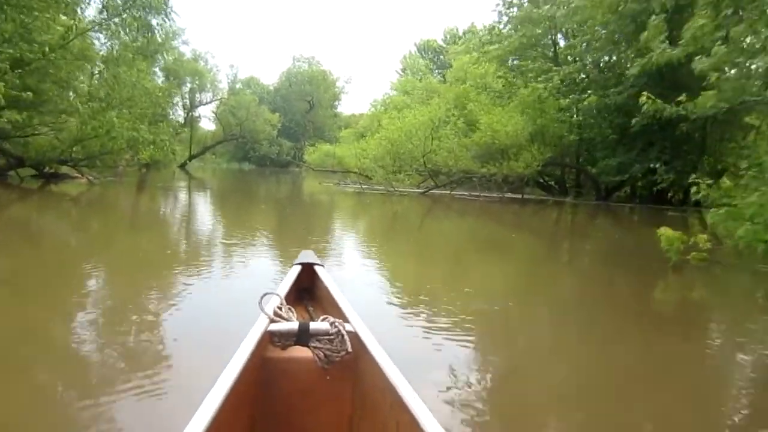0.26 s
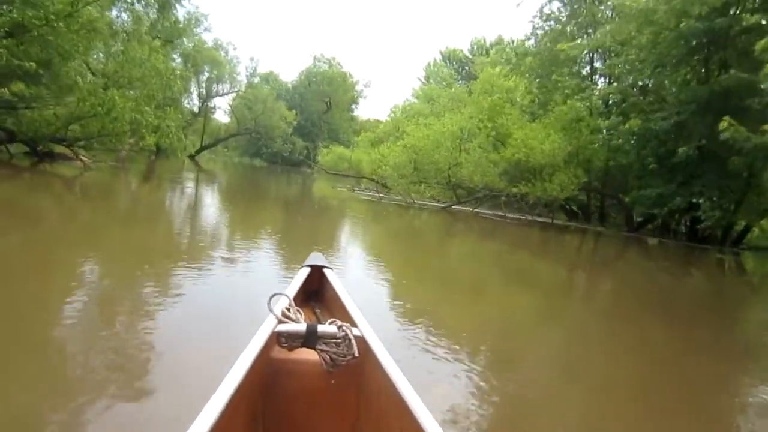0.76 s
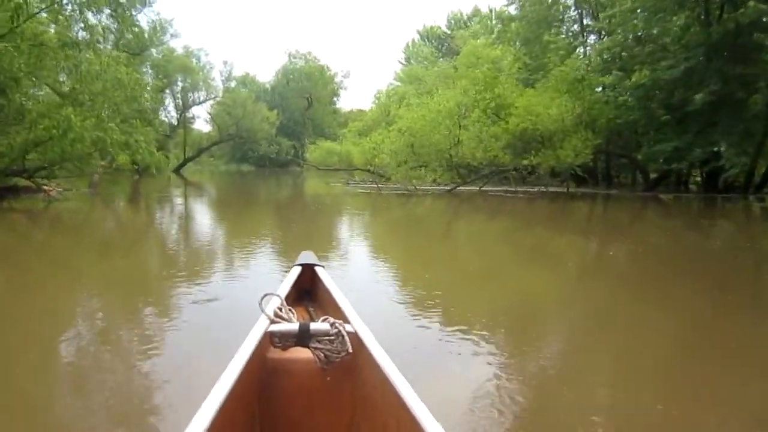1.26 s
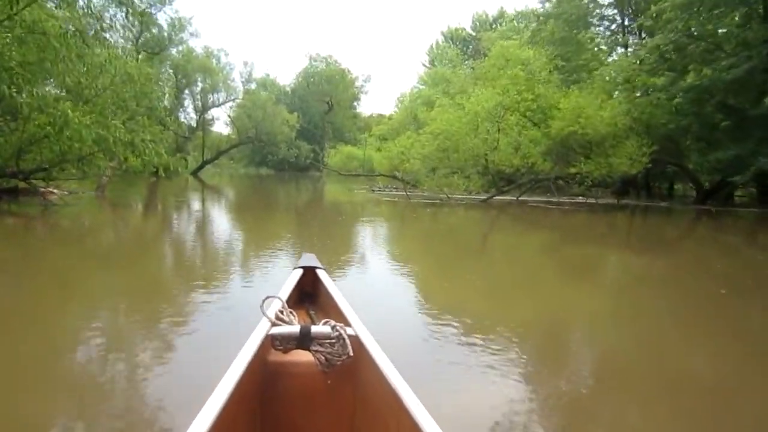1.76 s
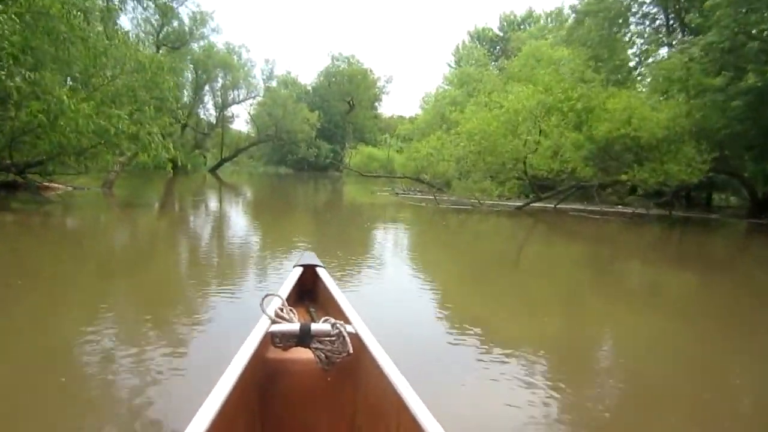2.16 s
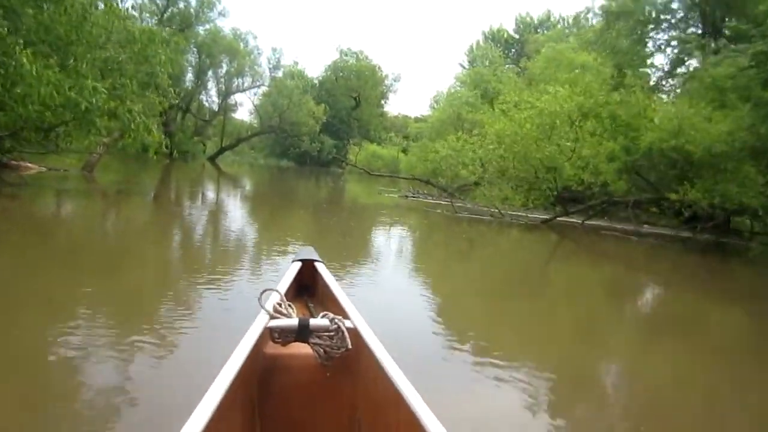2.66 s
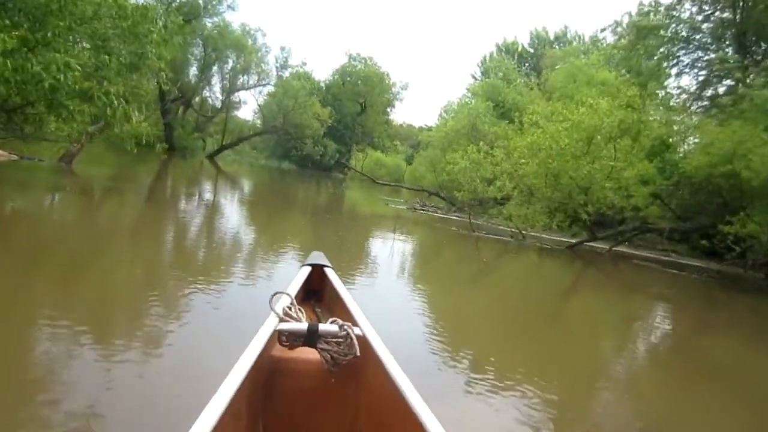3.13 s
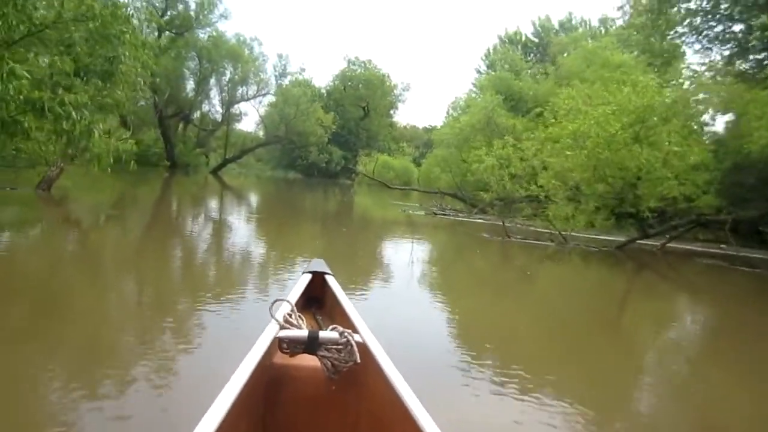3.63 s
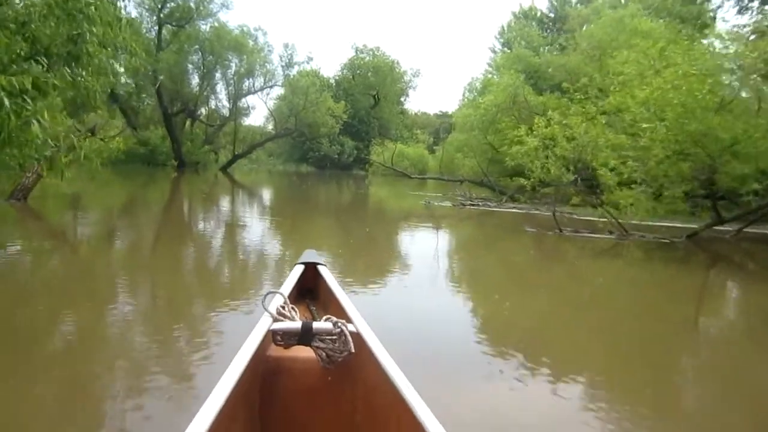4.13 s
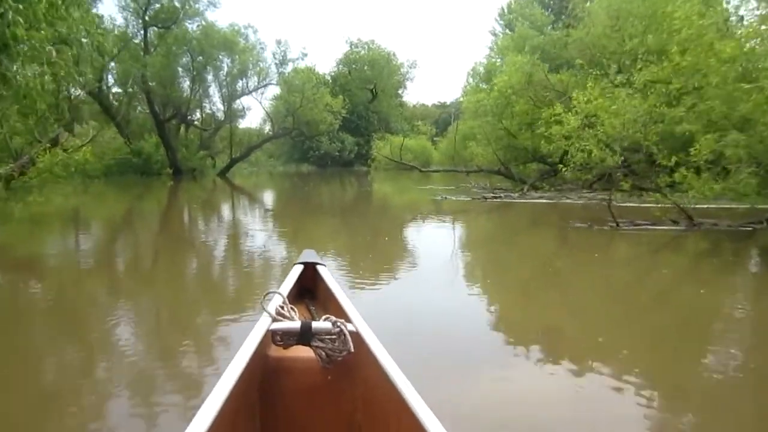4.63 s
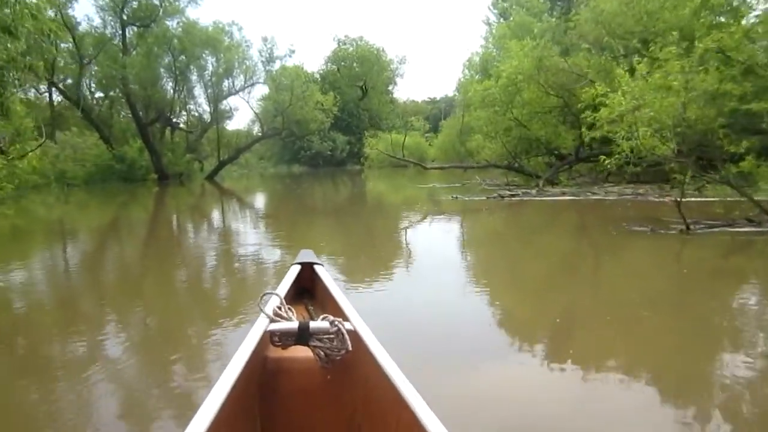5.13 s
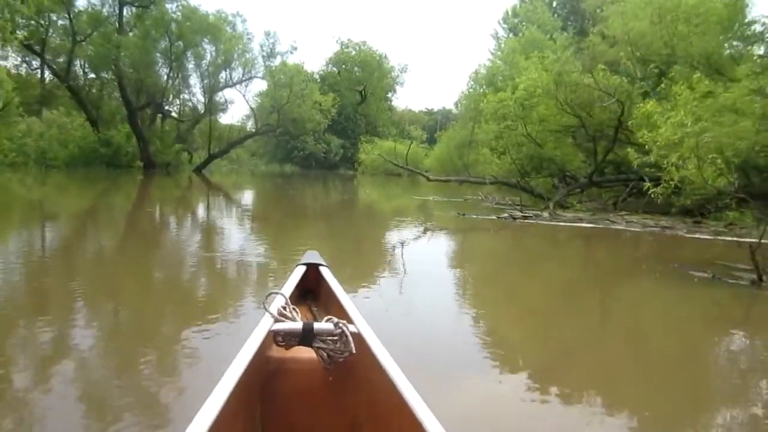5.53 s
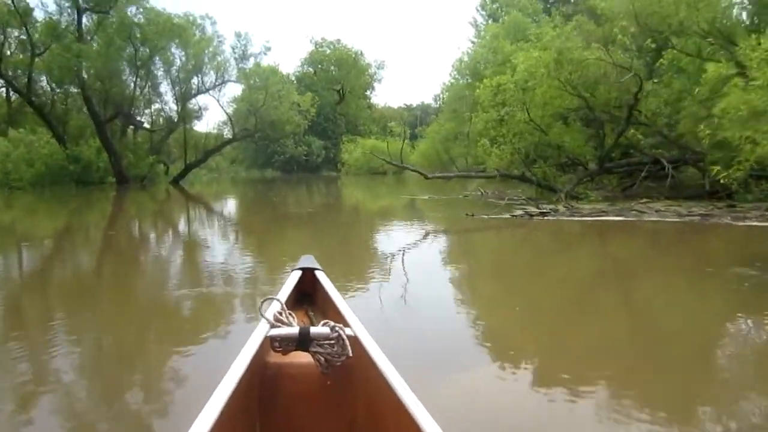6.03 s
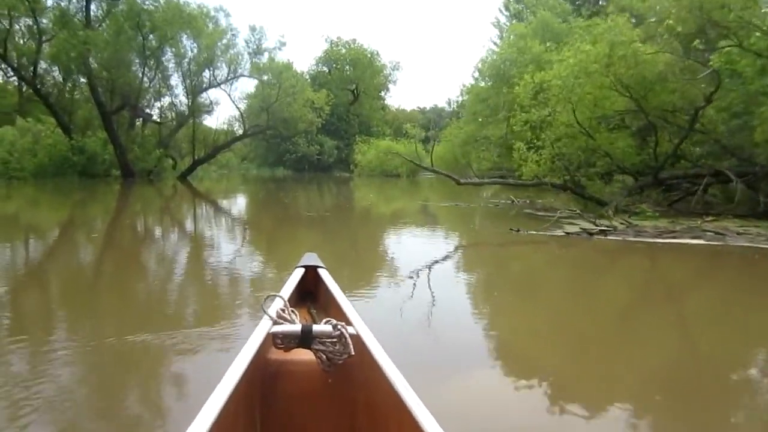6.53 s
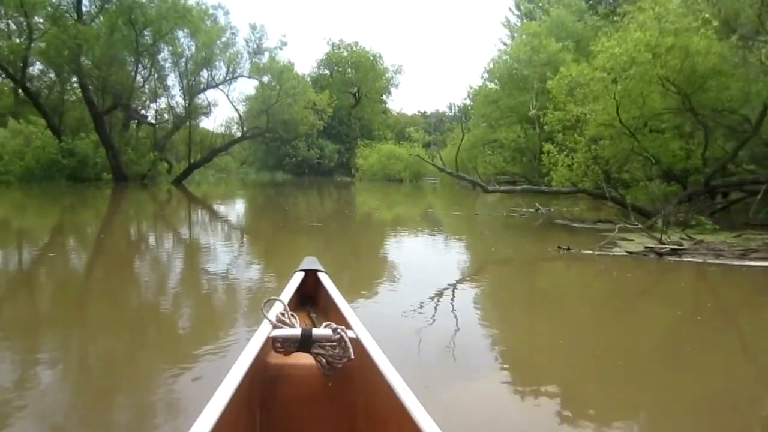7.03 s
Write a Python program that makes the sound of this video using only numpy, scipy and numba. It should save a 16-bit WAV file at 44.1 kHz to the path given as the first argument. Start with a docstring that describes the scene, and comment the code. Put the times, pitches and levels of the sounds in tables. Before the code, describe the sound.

Low wind buffeting, then a hollow paddle knock, gurgling splashes, bright drips and sharp ticks on a calm tree-lined river.

```python
"""A canoe drifts on a flooded river, heard by a small camera in the hull, over the steady hush of the trees.
First gusts buffet the microphone (bunched pressure wiggles) and far birds whistle (wavering sine tones).
Near 2 s the paddle knocks the wooden hull (ringing modes), then splashes, fizzes and drips (bubbles, bursts).
Falling chirps follow at 3.5 s, a knock at 4.1 s and strong gusts after 5.2 s; from 6 s on,
whistles return, and a last knock and more water end the scene."""
import sys
import numpy as np
from scipy import signal
from scipy.fft import rfft, irfft
from scipy.io import wavfile
from scipy.ndimage import uniform_filter1d
from numba import njit

SR = 44100
rng = np.random.default_rng(int(sys.argv[2]) if len(sys.argv) > 2 else 0)


def dump_mix(stems):
    """Bounce the given channels to the path in sys.argv[1] as a 16-bit WAV at rate SR."""
    frames = np.atleast_2d(stems).T  # one column per channel
    limited = np.clip(frames, -1, 1)  # hard clip at full scale
    pcm = np.round(limited * 32767).astype(np.int16)
    wavfile.write(sys.argv[1], SR, pcm)


N = 321523
TIME = np.arange(N) / SR

# All levels of wind, water, wood and birds are those ahead of the microphone's colour.
# slow pressure swings of the wind: time_s, level_db
RUMBLE = [(0.0, -35), (0.02, -33), (0.73, -28), (0.87, -17), (0.93, -36.5), (1.6, -33), (1.62, -43),
          (1.7, -25.5), (2.03, -39), (2.07, -36), (2.39, -31), (2.41, -26), (3.04, -39.5), (3.13, -26),
          (3.19, -34), (3.33, -34), (3.39, -17.5), (3.41, -25.5), (3.71, -38), (4.04, -16), (4.18, -30),
          (5.28, -31.5), (5.3, -26.5), (5.79, -34.5), (5.95, -29), (6.03, -39.5), (6.25, -25.5),
          (7.29, -35.5)]
RUMBLE_WANDER_DB = 2.5
# gusts over the microphone port: start_s, length_s, level_db, small_sharp_eddies_db
GUSTS = [(.02, 0.088, -25, -49), (.075, 0.095, -20.5, -31.5), (.22, 0.35, -23, -36.5),
         (.665, 0.024, -15, -31), (.72, 0.085, -19, -37.5), (.83, 0.078, -16, -39.5),
         (.95, 0.18, -34.5, -69), (1.17, 0.057, -28.5, -57), (1.44, 0.018, -23.5, -44),
         (1.52, .13, -26.5, -54), (1.67, 0.056, -19.5, -33.5), (1.79, 0.018, -31.5, -41),
         (1.88, .14, -24.5, -43), (2.17, 0.072, -34, -48.5), (3.97, 0.14, -37, -44.5),
         (4.15, .12, -33, -42), (5.26, 0.12, -22.5, -37), (5.42, 0.044, -14, -43), (5.48, 0.038, -19, -44),
         (5.56, 0.11, -26, -58), (5.76, 0.14, -25.5, -48), (5.92, 0.04, -19.5, -47),
         (6.13, 0.21, -28.5, -47), (6.66, 0.096, -31, -42)]
GUST_ATTACK_S, GUST_RELEASE_S = 0.015, 0.044  # to rise or fall by 20 dB
CALM_DB, CALM_SHARP_DB, CALM_WANDER_DB = -40, -45.5, 3.5  # wind between the gusts
# loudest single eddies: time_s, swell_peak_db, wiggle_hz, tip_db (against the swell)
BUFFETS = [(.078, -10, 165, 3), (0.084, -13, 198, -0.5), (0.0922, -5, 290, -2.5), (0.1164, -4, 258, -5.5),
           (0.1572, -10.5, 320, -4.5), (0.1743, -7, 159, -12.5), (0.1958, -11.5, 111, -6),
           (.314, -12.5, 270, -15), (0.335, -19.5, 113, 5.5), (.419, -17.5, 126, 0), (0.497, -12, 316, -20),
           (0.5162, -7.5, 227, 2.5), (0.669, -20.5, 119, 7), (.682, -14, 172, -9.5),
           (0.729, -17.5, 120, -2), (0.7779, -12.5, 269, -3), (.8106, -10.5, 173, -6),
           (.84, -12.5, 274, -7), (0.8867, -17.5, 174, -1), (0.915, -22, 116, 7.5), (1.653, -12, 244, -6),
           (1.685, -11.5, 387, -8.5), (1.6948, -5, 234, -7.5), (1.7085, -15, 204, -24),
           (5.2814, -25, 197, -18.5), (5.3139, -9, 116, -3.5), (5.3217, -5.5, 246, -9),
           (5.355, -4.5, 323, -10), (5.3721, -6.5, 235, -3), (5.4478, -7, 156, -5.5),
           (5.467, -9.5, 122, -4.5), (5.5097, -22.5, 138, 6), (5.6205, -13, 147, -3),
           (5.6654, -15.5, 173, -2), (6.1754, -14, 131, -7.5)]
TIP_WIDTH_S, TIP_HZ = 0.00108, 560
CRACK_HZ, CRACK_WIDTH_S, CRACK_DB = 1198, 0.00092, -16  # edge of the tip, dB against the tip
# lone dents of pressure in calmer air: time_s, depth_db, width_s
POPS = [(2.423, -13, 0.0029), (2.74, -25.5, 0.0031), (2.809, -18.5, 0.0023), (3.14, -19, 0.0037),
        (3.382, -17.5, .004), (3.972, -19, 0.002), (4.045, -16, 0.0043), (6.495, -14.5, 0.0016),
        (6.731, -22.5, 0.0035), (6.777, -17, 0.0033), (7.169, -22.5, 0.0022)]
# paddle against the hull: time_s, strength_db, low_modes_db and top_modes_db (against the strength)
KNOCKS = [(1.935, -9, 0, -15), (2.078, -28.5, 4.5, -15), (2.106, -15, 1, -40), (4.099, -20.5, 4, -37),
          (6.589, -15.5, 0.5, -6)]
# ringing modes of the wooden hull: pitch_hz, level_db (against the blow), fade_by_60_db_s
HULL = [(152, 11.5, 0.026), (201, 1.5, 0.12), (246, 2.5, 0.092), (308, -3, 0.12), (378, -9.5, 0.082),
        (477, -10, 0.2), (580, -0.5, 0.076), (694, -4.5, 0.065), (793, -8, 0.069), (953, -14, 0.034),
        (1232, 2, 0.03), (1370, 3, 0.015), (1725, 4, 0.0088), (2060, -3.5, .02), (2140, -12, .025),
        (3010, -26, 0.018), (3510, -8.5, 0.013)]
# water stirred by blade and bow: time_s, gurgle_db, spray_db
WATER = [(0.0, -50.5, -68.5), (0.45, -56.5, -65.5), (1.01, -61, -68), (1.36, -54, -68), (1.56, -50, -66),
         (2.37, -52, -66), (2.76, -41.5, -54.5), (3.35, -52, -61), (4.32, -48.5, -62.5), (4.83, -49, -60),
         (5.66, -53.5, -62), (6.15, -50, -62), (6.98, -47.5, -63.5), (7.29, -49.5, -52.5)]
SLOSH_DB = 1  # how far the flow wanders in level
# splashes and swirls of the blade: start_s, length_s, gurgle_db, spray_db
SPLASHES = [(.31, 0.38, -49.5, -65.5), (1.09, 0.34, -71, -63), (1.335, 0.18, -48.5, -62.5),
            (1.75, .03, -42.5, -60), (2.44, 0.026, -46, -60), (2.488, 0.014, -37.5, -54.5),
            (2.59, 0.085, -43.5, -55.5), (2.79, .17, -37, -51.5), (3.335, .035, -39, -55),
            (3.76, 0.011, -34, -50), (3.815, 0.011, -43.5, -58), (4.39, 0.23, -69, -59.5),
            (4.76, 0.24, -48, -57.5), (5.27, .07, -48, -65), (5.88, .07, -43, -55.5),
            (6.03, 0.017, -40, -54.5), (6.14, 0.12, -57, -65), (6.3, 0.02, -49.5, -62),
            (7.13, .2, -51.5, -56.5)]
SPLASH_ATTACK_S, SPLASH_RELEASE_S = 0.013, 0.07  # to rise or fall by 20 dB
# loudest bubbles under blade and drips: time_s, strength_db, pitch_hz, pitch_change_factor
DRIPS = [(.3107, -31, 2000, 1.2), (0.388, -33.5, 1680, 1.05), (.408, -39, 2050, 1.5),
         (.618, -37, 1920, 1.2), (1.3374, -35, 2600, 1.3), (1.3923, -37, 1490, 1.4),
         (1.497, -34, 1750, 1.2), (1.7554, -32, 2810, 1.2), (1.7786, -27, 1930, 0.96),
         (2.165, -28, 984, 3.4), (2.4194, -36, 1770, 1.2), (2.4483, -30.5, 1620, 2.1),
         (2.461, -26.5, 1265, 1.3), (2.4934, -22.5, 1640, 1.1), (2.494, -19, 857, 1.4),
         (2.6, -29.5, 2750, 1.2), (2.614, -22.5, 820, 0.84), (2.626, -25.5, 686, 1.8),
         (2.6299, -30, 2220, .98), (2.636, -26, 860, 1.6), (2.644, -25, 716, 0.87),
         (2.7087, -29, 2380, 1.5), (2.8133, -37, 1600, 1.2), (2.948, -27, 1960, 1.2),
         (3.0804, -34, 2430, 1.2), (3.3378, -35, 1830, .83), (3.354, -26.5, 1830, 1),
         (3.419, -32.5, 1174, 1.2), (3.4768, -34.5, 1980, 1.1), (3.7194, -33, 1600, 1.2),
         (3.7646, -29, 1940, 1.1), (3.7774, -28, 1460, 0.58), (3.797, -38, 1790, 1.5),
         (3.8226, -22, 1870, 1.6), (4.035, -28, 1320, 1.8), (4.2707, -34, 1660, 1.3),
         (4.349, -33, 2870, 1.2), (4.361, -29, 943, 1.9), (4.42, -40, 2050, 1.2), (4.497, -37, 3700, 1.2),
         (4.5325, -40, 1690, 1.1), (4.5537, -36, 1670, 1.2), (4.568, -40, 3100, 1.3),
         (4.737, -36, 3450, 1.1), (4.796, -30.5, 2340, 1.5), (4.848, -23.5, 1650, 1.3),
         (4.8597, -26, 3130, 1.1), (4.878, -25, 2200, 1.8), (4.915, -27, 3380, 1.6),
         (4.9326, -25, 2600, 1.4), (4.9435, -26, 3000, 1.6), (4.9602, -32, 1680, 1.1),
         (5.004, -36, 1670, 1.2), (5.038, -36, 2360, 1.), (5.08, -35, 3240, 1.7), (5.1896, -32, 1730, 1.2),
         (5.305, -36, 2100, 1.6), (5.4271, -37, 1930, 1.2), (5.4535, -32, 1980, 1.5),
         (5.5523, -37, 2420, 1.2), (5.5812, -38, 1750, 1.1), (5.898, -31, 2480, 2.1),
         (6.035, -29.5, 1940, 0.91), (6.052, -31, 1950, 1.05), (6.1459, -29, 1830, 1.6),
         (6.2577, -34, 2680, 1.1), (6.3149, -31, 1670, 1.4), (6.989, -39, 1780, 1.2),
         (7.0995, -31.5, 2740, 1.6), (7.133, -36, 1900, 1), (7.2488, -23.5, 2250, 0.8),
         (7.258, -27, 2700, 1)]
DRIP_CYCLES = 45  # until a bubble has faded by 60 dB
# loudest droplets bursting: time_s, strength_db, centre_hz, finest_spray_db (against the strength)
TICKS = [(.1265, -46, 4800, -10), (0.534, -37, 5070, -20), (0.91, -45, 4700, 4.5),
         (1.0887, -41.5, 5640, -22), (1.248, -45, 8300, 14.5), (1.3029, -42, 5450, -11),
         (1.3648, -35.5, 5170, -2), (1.4277, -35, 5640, -6), (1.453, -30.5, 4400, -5),
         (1.6926, -28, 5460, -17), (1.7528, -25, 5830, -22.5), (1.923, -33, 5320, -19),
         (1.936, -30, 5590, -10), (2.5627, -33.5, 5390, -14), (2.6303, -28, 4370, -4),
         (2.709, -29, 4730, -4), (2.8944, -12, 5000, 1), (2.9152, -17, 4170, -11), (3.0767, -36, 7200, -9),
         (3.234, -36, 4470, -9), (3.338, -26, 4370, -12), (3.349, -24, 5300, -4), (3.675, -39, 4470, -9),
         (3.7633, -23.5, 4880, 0), (3.77, -24.5, 4880, 1.5), (3.8217, -30.5, 4360, -11),
         (4.0603, -34, 4510, -6), (4.4025, -35, 5630, -1), (4.4623, -34, 5960, -3), (4.5483, -32, 5700, 1),
         (4.668, -31.5, 5860, -20), (4.7055, -33.5, 4340, -4), (4.7681, -45, 6650, -9),
         (4.797, -39, 5700, -11), (4.8184, -32, 5760, -1), (4.836, -36, 5240, -9), (4.8626, -28.5, 6130, 1),
         (4.9247, -30.5, 5270, -12), (4.944, -28, 4360, -3), (5.1417, -28, 4670, -2.5),
         (5.8814, -39, 4500, -9.5), (5.907, -34, 5760, -23), (5.9509, -35, 4970, -23),
         (6.169, -38, 6320, -14), (6.782, -35, 4470, -3), (7.123, -33.5, 6940, -24), (7.205, -29, 5400, -7),
         (7.2514, -32, 5580, -7)]
TICK_T60_S = .014  # fade by 60 dB
# far whistles: start_s, length_s, start_hz, end_hz, level_db
WHISTLES = [(0.308, 0.093, 2300, 2500, -58), (0.401, .08, 2410, 2470, -64), (0.407, .1, 2990, 2940, -63),
            (0.507, 0.091, 2960, 2920, -57), (.63, 0.37, 2860, 2720, -68), (3.15, 0.062, 4700, 3500, -56),
            (3.225, .025, 3780, 3980, -54), (3.255, .035, 4400, 3500, -60), (3.43, .05, 4580, 4050, -58),
            (6.08, .09, 2420, 2470, -57), (6.423, .05, 2150, 2320, -57), (6.47, 0.17, 2330, 2310, -54),
            (6.453, 0.065, 2860, 2630, -57), (6.529, 0.055, 2650, 2860, -52.5),
            (6.6, 0.25, 2920, 2760, -60), (6.94, 0.072, 3380, 3000, -59), (7.0, 0.11, 3200, 3030, -59),
            (6.998, 0.14, 2710, 2670, -57)]
WHISTLE_SWELL = 0.48  # small: sudden start and end; large: soft
# short falling chirps of a second bird: start_s, start_hz, end_hz, level_db
CHIRPS = [(3.478, 3800, 3170, -45.5), (3.598, 4000, 3200, -46.5), (3.718, 3650, 3140, -46),
          (3.84, 3700, 3210, -49), (3.955, 4040, 3180, -43.5)]
CHIRP_S = 0.019
# tone colour of the background hush: pitch_hz, relative_level_db (per Hz)
HUSH = [(24, -23.5), (40, 3), (89, 0.5), (207, -6), (260, -15), (522, -13), (621, -20), (926, -23.5),
        (3740, -52.5), (7160, -51), (9410, -63), (11500, -68.5), (13700, -64.5), (15500, -87.5)]
HUSH_DB = -33.5  # overall level
# colour of the microphone in its housing: pitch_hz, gain_db
MIC = [(20, 0), (50, -3), (100, 1), (2500, 0), (4000, -2.5), (6000, -1), (7500, -2.5), (9000, -4.5),
       (10300, -11.5), (11700, -31), (13400, -19.5), (15000, -24)]
TOP_HZ = 15600  # everything above is cut
KNEE = 6.  # large: peaks round off later and harder


def wind():
    """Eddies swept over the port are short pressure wiggles, bunched in flurries; small ones are sharper."""
    gust, sharp = swells(GUSTS, GUST_ATTACK_S, GUST_RELEASE_S)
    gust = np.hypot(gust, undb(CALM_DB + CALM_WANDER_DB * walk(14)))
    sharp = np.hypot(sharp, undb(CALM_SHARP_DB))
    flurry = undb(1.05 * walk(45))

    large = swarm(count=3000, lo_hz=117.8, hi_hz=399, turns=3.6, scatter_db=2.0, glide=0.81, soft=0.5)
    large = level(flurry * band(large, 79.0, 546), 0)
    small = swarm(count=4000, lo_hz=377, hi_hz=1290, turns=3.45, scatter_db=2.5, glide=0.55, soft=0.32)
    small = level(flurry * band(small, 330, 1030), 0)

    swings = swarm(count=600, lo_hz=29.7, hi_hz=81, turns=2.9, scatter_db=2.5, glide=0.61, soft=0.18)
    swings = level(band(swings, 22, 90) * undb(RUMBLE_WANDER_DB * walk(12)), 0)
    rumble_db = curves(RUMBLE)[0]
    return gust * large + sharp * small + undb(rumble_db) * swings


def buffets():
    """A passing eddy swells and fades within a cycle or two and has a sharp tip; a pop is a dent that rebounds."""
    out = np.zeros(N)
    t = TIME[:1024] - TIME[512]  # zero at the middle of each event
    for s, db, hz, tip_db in BUFFETS:
        phase = 2 * np.pi * 0.23 * rng.standard_normal()
        swell = undb(db) * np.exp(-(t * hz / 0.49) ** 2) * np.cos(2 * np.pi * hz * t + phase)
        tip = undb(db + tip_db) * np.exp(-(t / TIP_WIDTH_S) ** 2) * np.cos(2 * np.pi * TIP_HZ * t)
        crack = np.exp(-(t / CRACK_WIDTH_S) ** 2) * np.sin(2 * np.pi * CRACK_HZ * t)
        crack *= undb(db + tip_db + CRACK_DB)
        push_or_pull = rng.choice([-1, 1])
        add(out, s + t[0], push_or_pull * (swell + tip + crack))
    for s, db, width in POPS:
        dent = np.exp(-(t / width) ** 2)
        rebound = 0.21 * np.exp(-((t - 2.9 * width) / (1.2 * width)) ** 2)
        add(out, s + t[0], undb(db) * (rebound - dent))
    return out


def knocks():
    """The blow is a short rough push that rings the hull modes with fresh weights; the contact rattles on."""
    out, t = np.zeros(N), TIME[:8192]
    hz, mode_db, t60 = np.transpose(HULL)
    for s, db, low_db, top_db in KNOCKS:
        level_chance, pitch_chance = rng.standard_normal((2, len(hz)))
        tilt_db = np.interp(np.log(hz), np.log([250, 800, 2200]), [low_db, 0, top_db])
        blow_db = db + mode_db + tilt_db + 1.5 * level_chance
        mode_hz = hz * (1 + 0.034 * pitch_chance)
        ring = rings(0 * hz, -undb(blow_db), mode_hz, t60, np.ones_like(hz), 0.42, len(t))

        # sparse random pushes, soon weaker, ring the hull again
        bounces = (rng.random(len(t)) < .012) * rng.standard_normal(len(t)) * undb(2.5 - 60 * t / 0.017)
        add(out, s, ring + signal.fftconvolve(ring, bounces)[:len(t)])

        rattle = rng.standard_normal(len(t)) * undb(db - 60 * t / 0.076)
        add(out, s, band(rattle, 420, 1100) * undb(8.5) + band(rattle, 1100, 1900) * undb(top_db))
    return out


def water():
    """Small bubbles gurgle with rising pitch, finer ones fizz, spray crackles over a hiss."""
    gurgle_db, spray_db = curves(WATER)
    splash, mist = swells(SPLASHES, SPLASH_ATTACK_S, SPLASH_RELEASE_S)
    slosh = undb(SLOSH_DB * walk(22))  # the flow comes in spurts

    gurgle = swarm(count=3000, lo_hz=731, hi_hz=3086, turns=46.0, scatter_db=4.0, glide=1.1, soft=2.9)
    fizz = swarm(count=30000, lo_hz=920, hi_hz=3760, turns=9.8, scatter_db=3.5, glide=0.96, soft=2.0)
    low = level(gurgle, -3.5) + level(fizz, -4.0)

    spray = swarm(count=4000, lo_hz=3410, hi_hz=14500, turns=49.0, scatter_db=3.0, glide=1.3, soft=1.9)
    hiss = swarm(count=60000, lo_hz=3780, hi_hz=15000, turns=3.7, scatter_db=4.5, glide=0.65, soft=0.52)
    hiss = band(hiss, 3800, 15500) * undb(1.8 * walk(68))
    high = level(spray, -2.3) + level(hiss, 0.0)

    low_size = np.hypot(undb(gurgle_db), splash)
    high_size = np.hypot(undb(spray_db), mist)
    return slosh * (low_size * low + high_size * high)


def droplets():
    """Drips and air pockets ring, mostly with rising pitch; a bursting droplet is a wide tick of noise."""
    s, db, hz, glide = np.transpose(DRIPS)
    out = rings(s, undb(db), hz, DRIP_CYCLES / hz, glide, 0.4, N)
    # the drop slaps the surface: a shorter, higher ring with a quicker start
    out += rings(s, undb(db - 15.5), 1.6 * hz, 4.6 / hz, glide, .1, N)
    t = TIME[:2048]
    for s, db, hz, air_db in TICKS:
        burst = rng.standard_normal(len(t)) * undb(db - 60 * t / TICK_T60_S)
        body = undb(1.5) * band(burst, 0.5 * hz, 1.43 * hz)
        finest = undb(air_db) * band(burst, 8300, 18000)
        add(out, s, body + finest)
    return out


def birds():
    """Whistles are sines that waver and flutter on their way through the trees; chirps are quick falling sines."""
    out, flutter_db, waver = np.zeros(N), 4.1 * walk(45), 1 + 0.009 * walk(60)
    for s, length, start_hz, end_hz, db in WHISTLES:
        u = np.linspace(0, 1, int(length * SR))  # progress through the call
        now = slice(int(s * SR), int(s * SR) + len(u))
        hz = (start_hz + (end_hz - start_hz) * u) * waver[now]
        loudness = np.abs(np.sin(np.pi * u)) ** WHISTLE_SWELL * undb(db + flutter_db[now])
        add(out, s, loudness * np.sin(2 * np.pi * np.cumsum(hz) / SR))
    u = np.linspace(0, 1, int(CHIRP_S * SR))
    for s, start_hz, end_hz, db in CHIRPS:
        hz = end_hz + (start_hz - end_hz) * (1 - u) ** 2.4
        add(out, s, undb(db) * np.sin(np.pi * u) * np.sin(2 * np.pi * np.cumsum(hz) / SR))
    # trunks and water scatter the calls into a blur of echoes
    woods = level(rng.standard_normal(8192) * undb(-60 * TIME[:8192] / .3), -43.)
    return out + signal.fftconvolve(out, woods)[:N]


def hush():
    """Leaves, far water and the camera's own noise are one coloured noise; it swells a little."""
    noise = colour(rng.standard_normal(N), HUSH)
    return level(noise * undb(2.0 * walk(2.306)), HUSH_DB)


def swarm(count, lo_hz, hi_hz, turns, scatter_db, glide, soft):
    """Grains at random moments, fading over some turns: pitch even per octave, a few much louder than the rest."""
    when, pitch, size, sign = rng.random((4, count))
    hz = lo_hz * (hi_hz / lo_hz) ** pitch
    size = undb(-scatter_db * np.log(size + 0.0055)) * np.sign(sign - .5)
    return level(rings(when * N / SR, size, hz, turns / hz, np.full(count, glide), soft, N), 0)


@njit
def rings(s, size, hz, t60, glide, soft, n):
    """Damped oscillations that swell over soft cycles; the pitch moves by the factor glide over each ring."""
    out = np.zeros(n)
    for k in range(len(s)):
        start, count = int(s[k] * SR), int(t60[k] * SR) + 2
        # z is a pointer that p turns and shrinks at every sample; turn bends the pitch
        z, p = size[k] + 0j, np.exp((2j * np.pi * hz[k] - np.log(1000) / t60[k]) / SR)
        turn = np.exp(2j * np.pi * hz[k] * (glide[k] - 1) / SR / count)
        held, release = 1., np.exp(-hz[k] / soft / SR)
        for i in range(start, min(start + count, n)):
            held *= release
            out[i] += z.imag * (1 - held)
            z *= p
            p *= turn
    return out


def swells(rows, attack_s, release_s):
    """Levels of events that rise, hold and fall; one power sum for each level column."""
    s, length, *levels_db = np.transpose(rows)[:, :, None]
    t = TIME[::64]  # a coarse clock is enough for slow levels
    outside = np.maximum((s - t) / attack_s, (t - s - length) / release_s)
    fade_db = 20 * np.clip(outside, 0, 10)
    sizes = [np.sqrt(np.sum(undb(db - fade_db) ** 2, axis=0)) for db in levels_db]
    return [np.interp(TIME, t, size) for size in sizes]


def curves(table):
    """Columns of the table, joined by straight lines in time."""
    s, *columns = np.transpose(table)
    return [np.interp(TIME, s, c) for c in columns]


def walk(rate):
    """Random levels held for 1 / rate seconds and smoothed twice; spread near 1."""
    k = int(SR / rate)
    steps = np.repeat(rng.standard_normal(N // k + 1), k)
    return 1.6 * uniform_filter1d(uniform_filter1d(steps, k), k)[:N]


def colour(x, points):
    """Weights the spectrum by (Hz, dB) points."""
    hz, db = np.transpose(points)
    grid = np.maximum(np.arange(N // 2 + 1) * SR / N, 1)
    gain = undb(np.interp(np.log(grid), np.log(hz), db))
    return irfft(rfft(x) * gain, N)


def band(x, lo_hz, hi_hz):
    """Keeps the pitches between two limits."""
    return signal.sosfilt(signal.butter(2, [lo_hz, hi_hz], "bandpass", fs=SR, output="sos"), x)


def undb(db):
    """Turns decibels into a plain factor."""
    return 10 ** (np.asarray(db) / 20)


def level(x, db):
    """Sets the average (RMS) level."""
    return x * undb(db) / np.sqrt(np.mean(x ** 2))


def add(out, s, x):
    """Mixes a short sound in from time s."""
    i = int(s * SR)
    out[i:i + len(x)] += x[:N - i]


def scene():
    """Everything but the hush takes on the colour of the microphone."""
    near = wind() + buffets() + knocks() + water() + droplets() + birds()
    return (colour(near, MIC) + hush())[None]


def record(dry):
    """The loudest peaks round off at full scale; the top is cut."""
    rounded = dry / (1 + np.abs(dry) ** KNEE) ** (1 / KNEE)
    return signal.sosfilt(signal.ellip(8, .2, 70, TOP_HZ, fs=SR, output="sos"), rounded)


dry = scene()
out = record(dry)
dump_mix(out)
```